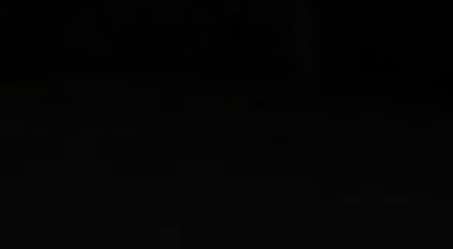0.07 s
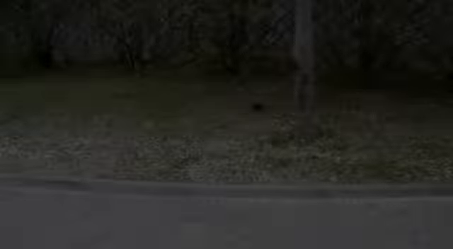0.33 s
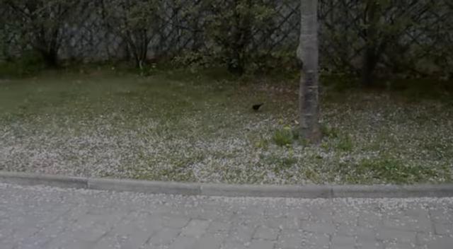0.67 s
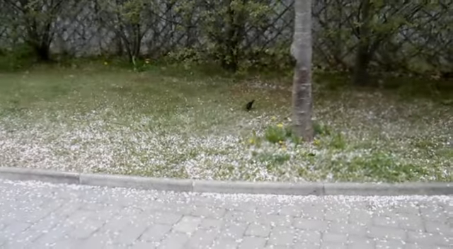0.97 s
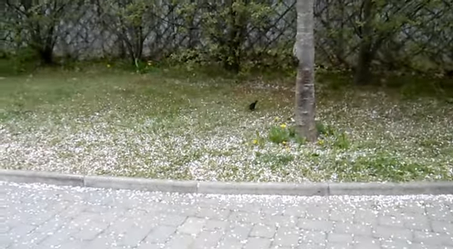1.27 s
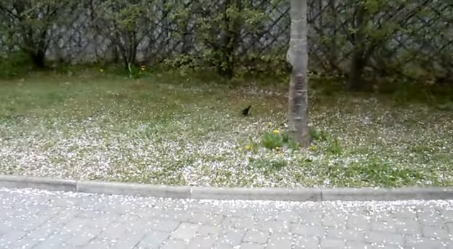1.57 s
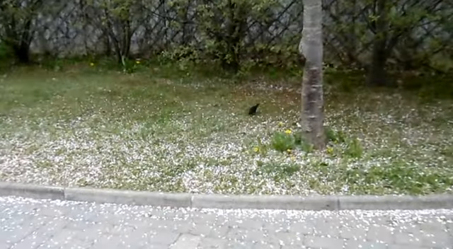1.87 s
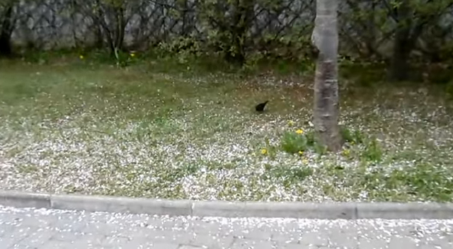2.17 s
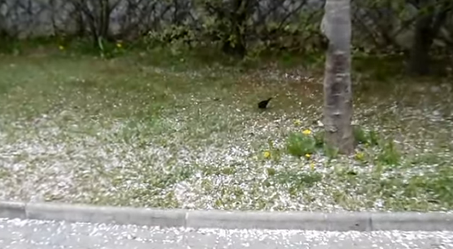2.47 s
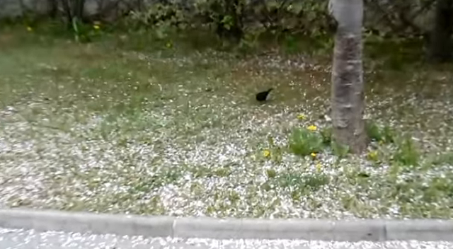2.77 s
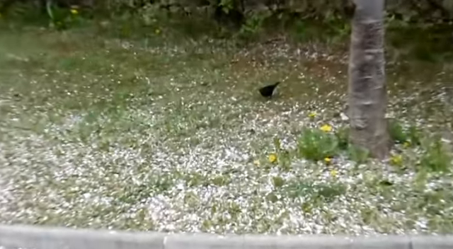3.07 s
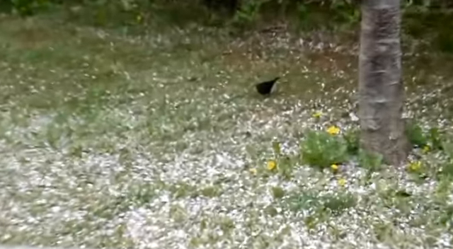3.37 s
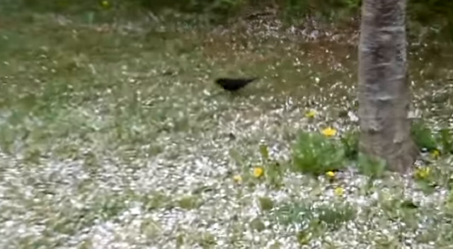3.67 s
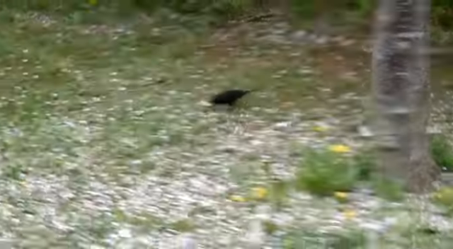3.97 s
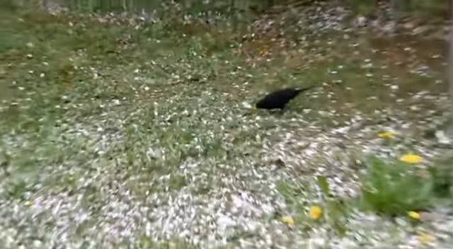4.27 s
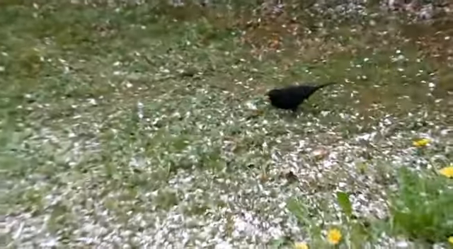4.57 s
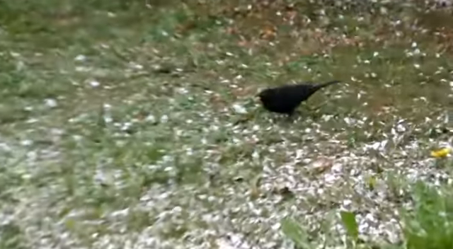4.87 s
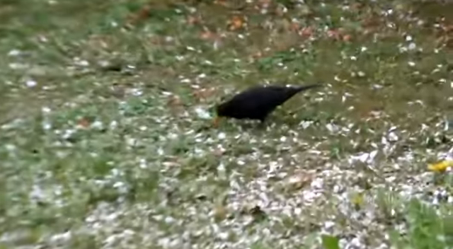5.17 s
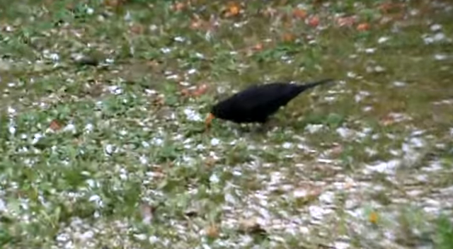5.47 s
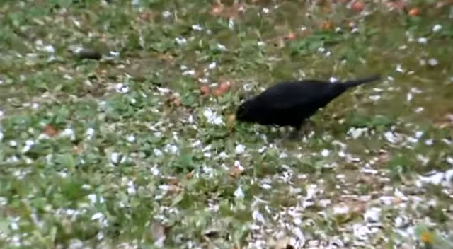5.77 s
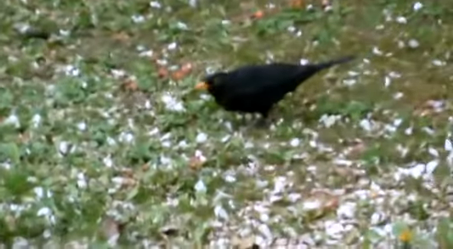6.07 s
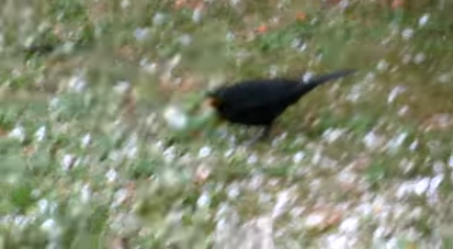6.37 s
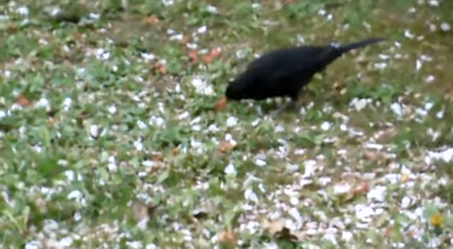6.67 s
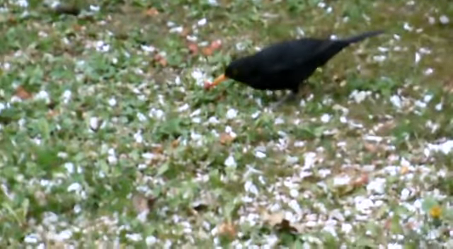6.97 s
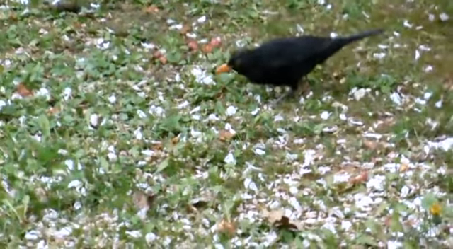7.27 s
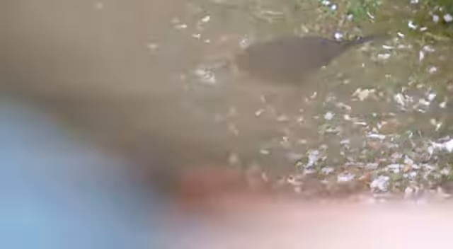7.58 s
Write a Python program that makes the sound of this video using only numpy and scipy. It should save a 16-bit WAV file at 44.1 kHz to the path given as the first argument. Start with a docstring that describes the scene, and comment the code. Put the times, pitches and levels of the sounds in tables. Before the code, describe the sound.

Steady distant traffic hums over a quiet park, with small camera clicks, a faint zoom sizzle and a coasting bicycle ticking closer.

```python
"""A quiet park lawn fades in: far tyres blend into a steady wash and a few engines drone. A finger ticks on a
hand-held camera, then its zoom lever snaps and rings the plastic shell. A motor moves the lens, which sizzles
and ticks from rubbing, the sizzle swelling for a while as two cars pass a little closer. The lens clicks
against its stop. Near the end a bicycle coasts up the path, ticking fast as the small catch in its freewheel
drops off tooth after tooth."""
import sys
import numpy as np
from scipy import signal
from scipy.fft import rfft, irfft, next_fast_len
from scipy.io import wavfile

SR = 44100
rng = np.random.default_rng(int(sys.argv[2]) if len(sys.argv) > 2 else 0)


def master_out(mix):
    """Clip the mix to full scale and print it as 16-bit PCM to the path in sys.argv[1]."""
    frames = np.transpose(np.atleast_2d(mix))
    ceiling = np.clip(frames, -1, 1)
    pcm = np.round(ceiling * 32767).astype(np.int16)
    wavfile.write(sys.argv[1], SR, pcm)


N = 344421
TIME = np.arange(N) / SR

# the tone colour of plastic rubbing on plastic: (frequency [Hz], level [dB])
PLASTIC_GRIT = [(2200, -2.5), (3500, 4.5), (5500, 4.5), (7500, 1.5), (9000, -7), (11000, -11)]
# the tone colour of hissing tyres: (frequency [Hz], level [dB])
TYRE_HISS = [(700, 0), (1200, -3), (1600, 2.5), (2200, 0.5), (3000, -5.5), (3900, -7.5), (4700, -8.5),
             (5700, -10), (6800, -11), (9000, -17.5), (11000, -30.5)]


def zoom_snaps(shell_db=-15.0, crack_db=6.0, grit_db=-9.0, low_cut_hz=1050):
    """The lever and the lens stop snap: each short, gritty crack makes the plastic shell ring."""
    # the snaps: (time [s], level [dB], pitch of the crack [Hz], share passed to the shell [dB])
    snaps = [(1.3983, -35.5, 4700, 2), (1.4186, -12, 3960, 2), (5.9112, -30.5, 2130, -12),
             (5.934, -33, 3310, -4), (5.9378, -33, 2980, -1), (5.946, -30.5, 3400, -1),
             (6.145, -41, 2800, -10), (6.1725, -15, 4700, -17)]
    # the notes the shell rings with: (pitch [Hz], level [dB], time to fall 60 dB [s])
    shell_notes = [(1160, -11, .012), (1520, -24, 0.0097), (2600, -10.5, 0.014), (3170, -2, 0.0019),
                   (4030, -8, 0.0063), (4640, 0.5, 0.003), (5330, -23, 0.0041), (6070, 8, 0.004),
                   (7500, -2, 0.0027), (8550, 2, .003), (9860, 5.5, 0.0041)]
    cracks = [ring(impulses([(s, db)]), hz, decay_s=0.0021) for s, db, hz, _ in snaps]
    push = sum(from_db(share_db) * crack for (*_, share_db), crack in zip(snaps, cracks))
    shell = 0
    for k, (hz, db, decay_s) in enumerate(shell_notes):
        shell += (-1) ** k * from_db(db) * ring(push, hz, decay_s)   # every other note is flipped
    grit = slips([(s, db) for s, db, _, _ in snaps], rise_s=0.0007) * noise(PLASTIC_GRIT)
    sound = from_db(shell_db) * shell + from_db(crack_db) * sum(cracks) + from_db(grit_db) * grit
    # so small a body gives off no bass
    return signal.sosfilt(signal.butter(3, low_cut_hz, "high", fs=SR, output="sos"), sound)


def bicycle(nearest_s=7.856, nearest_m=0.72, speed_m_per_s=6.5, ticks_per_s=55.1):
    """The freewheel's catch drops off each tooth: thin from afar, louder and fuller as it nears."""
    # the tone colour of the catch from far away: (frequency [Hz], level [dB])
    far_colour = [(2000, -15), (4500, -15), (6000, -1), (6800, 5), (8000, 7), (9000, -4), (11000, -15)]
    # the same catch close by: (frequency [Hz], level [dB])
    near_colour = [(800, -10), (1100, 5), (1450, -11), (2100, -10), (2500, 4), (2900, 7), (3500, 1.5),
                   (4200, -2.5), (4950, 2.5), (5800, 1.5), (7000, -1), (9000, -7.5), (11000, -16)]
    catch_db, tyres_db, rattle = -47, -50.5, 0.19
    distance_m = np.hypot(nearest_m, speed_m_per_s * (TIME - nearest_s))
    near = 1 / (1 + (distance_m / 3.3) ** 2)   # more full than thin within 3.3 m
    since_tick_s = (TIME - 7.7853) % (1 / ticks_per_s)   # one tick falls at 7.7853 s
    ticks = burst(since_tick_s, rise_s=0.0016) + rattle * (1 + near / 2)
    ticks = unit_power(ticks * flicker(db=1.0, rate=30))
    metal = np.sqrt(1 - near) * noise(far_colour) + np.sqrt(near) * noise(near_colour)
    coasting = gate(start_s=6.63, end_s=np.inf, edge_s=0.55)
    freewheel = coasting * from_db(catch_db) / distance_m * ticks * metal
    tyres = from_db(tyres_db) * near * noise(TYRE_HISS)
    return freewheel + tyres


def camera_ticks(thin_db=-3.5, full_db=-3.0, rise_s=0.00081):
    """Tiny slips in the lens gears make bright ticks, a few of them fuller than the rest; the first, before the
    motor starts, is a finger touching the camera."""
    # the ticks: (time [s], level [dB], fullness [0-1])
    ticks = [(1.077, -32, 0.5), (1.77, -38, 0.03), (2.19, -44, 0.06), (2.4445, -44, 0.5),
             (2.783, -39.5, 0.06), (2.9914, -40, 0), (3.1143, -38, .05), (3.119, -38.5, 0),
             (3.1583, -35, .15), (3.3106, -44, 0), (3.553, -41, 0.3), (4.3064, -45, 0.1),
             (5.6348, -47, 0.2)]
    # the tone colour of a thin tick: (frequency [Hz], level [dB])
    tick_colour = [(4500, -20), (5500, -3), (6400, 6.5), (7600, 11.5), (9000, 2), (11000, -20)]
    s, db, fullness = np.transpose(ticks)
    fullness_db = 10 * np.log10(np.clip(fullness, 1e-6, 1))
    thin = slips(np.c_[s, db], rise_s) * noise(tick_colour)
    full = slips(np.c_[s, db + fullness_db], rise_s) * noise(PLASTIC_GRIT)
    return from_db(thin_db) * thin + from_db(full_db) * full


def zoom_motor(start_s=1.68, end_s=5.9, running_db=-67, spin_up_s=0.026):
    """The motor starts with a soft jolt; then the moving lens rubs and sizzles inside its tube."""
    # the pitches the lens tube favours: (pitch [Hz], width [Hz], level [dB])
    tube_notes = [(4740, 340, 1), (6550, 480, 1), (7250, 460, -3), (9200, 370, -11)]
    # the motor's kick against the camera body: (time [s], level [dB])
    kick = [(1.677, -46)]
    # the tone colour of that kick: (frequency [Hz], level [dB])
    kick_colour = [(70, -2), (170, 0), (300, -10), (680, -9), (1200, -12)]
    rubbing = flicker(db=4.5, rate=60) * rng.standard_normal(N)
    sizzle = 0
    for hz, width_hz, db in tube_notes:
        sizzle += from_db(db) * signal.lfilter(*signal.iirpeak(hz, hz / width_hz, fs=SR), rubbing)
    spin_up = swell(start_s + spin_up_s, spin_up_s, db=-57)   # louder for a moment at first
    loudness = gate(start_s, end_s, edge_s=0.015) * (from_db(running_db) + spin_up)
    jolt = slips(kick, rise_s=0.0059) * noise(kick_colour)
    return loudness * unit_power(sizzle) + jolt


def scrapes():
    """Longer slides inside the camera swell and fade with a grainy rubbing noise."""
    # the slides: (time [s], length [s], level [dB])
    slides = [(1.415, 0.034, -47), (1.467, .016, -51.5), (1.683, 0.019, -51), (3.279, 0.12, -59.5),
              (5.63, 0.11, -57), (5.925, 0.083, -49.5)]
    # their tone colour: (frequency [Hz], level [dB])
    slide_colour = [(500, -10), (1700, 12.5), (3000, 5), (5000, 0.5), (6600, 3), (9000, -3), (11000, -24)]
    rubbing = unit_power(flicker(db=6.5, rate=150) * noise(slide_colour))
    return sum(swell(*slide) for slide in slides) * rubbing


def motor_swell():
    """The motor's sizzle swells once around 3 s with a faint, high crackle."""
    # the tone colour of that crackle: (frequency [Hz], level [dB])
    crackle_colour = [(5200, -6), (6200, -1), (6700, 3), (7400, -1), (9000, -6), (10500, -24)]
    crackle = unit_power(flicker(db=5.5, rate=60) * noise(crackle_colour))
    return swell(middle_s=3.07, length_s=1.25, db=-64.5) * crackle


def passing_cars():
    """The tyres of two nearer cars hum, rising out of the far traffic and sinking back."""
    # the cars: (time when nearest [s], level [dB], time to fall 3 dB [s])
    cars = [(4.12, -52, 0.41), (5.801, -60, 1)]
    # the tone colour of their hum: (frequency [Hz], level [dB])
    hum_colour = [(440, -9), (540, 3), (620, -1), (730, 1.5), (850, -7.5), (1000, -15)]
    power = sum((from_db(db) * going_by(s, fall_s)) ** 2 for s, db, fall_s in cars)
    return np.sqrt(power) * flicker(db=1.5, rate=8) * noise(hum_colour)


def far_engines(settle_s=2.0, wobble_rad=0.39):
    """Only the firing tone of each engine carries this far, and it flutters on its way through the air."""
    # spells of speeding up, slowing down or idling:
    # (start [s], length [s], first pitch [Hz], last pitch [Hz], first level [dB], last level [dB])
    runs = [ (0, 1.7, 56.3, 54.8, -52, -50), (.7, 1.5, 114, 102, -60, -63.5),
            (1.05, 1.06, 38.5, 43.5, -59, -53.5), (1.079, 1.05, 336, 361, -59.5, -65.5),
            (2.4, 5.2, 57.8, 71, -59.5, -67), (2.45, 5.23, 88, 119, -58.5, -63),
            (2.5, 1.93, 44.6, 52.5, -54, -61), (3.5, 2.3, 156, 171, -65, -67),
            (3.852, 1.0, 334, 352.4, -60, -65.5), (4.598, 1.6, 146.5, 135, -62.5, -65.5),
            (4.8, .95, 47.3, 45.6, -58, -55), (5.753, 0.66, 44.8, 29.8, -54, -62),
            (6.85, 0.58, 42.5, 42, -59, -56)]
    sound = 0
    for start_s, length_s, first_hz, last_hz, first_db, last_db in runs:
        end_s = start_s + length_s
        # the engine's speed changes fastest at first, then settles
        settled = 1 - np.exp(-np.clip(TIME - start_s, 0, length_s) / settle_s)
        hz = first_hz + (last_hz - first_hz) * settled / settled[-1]
        level_db = np.interp(TIME, [start_s, end_s], [first_db, last_db])
        loudness = from_db(level_db) * flicker(db=1.4, rate=5)
        cycles = np.cumsum(hz) / SR + rng.random()
        tone = np.sqrt(2) * np.sin(2 * np.pi * cycles + wobble_rad * drift(rate=4.4))
        sound += gate(start_s, end_s, edge_s=0.11) * loudness * tone
    return sound


def far_traffic(roar_db=-50, hiss_db=-52, rumble_db=-55.5):
    """Many far tyres blend into a roar, with a bright hiss above it and a lumpy rumble below."""
    # the tone colour of the roar: (frequency [Hz], level [dB])
    roar_colour = [(76, -31), (130, -4.5), (173, -4.5), (215, 1.5), (354, -2), (413, -4.5), (610, 0.5),
                   (740, -4), (937, -0.5), (1230, -4), (1500, -7.5), (1950, -41), (3300, -120)]
    # the tone colour of the rumble: (frequency [Hz], level [dB])
    rumble_colour = [(10, -14), (25, -7), (42, -0.5), (60, 0.5), (82, -3), (115, -7.5), (160, -15),
                     (260, -31)]
    slow_swell = going_by(nearest_s=3.1, fall_s=8.3)
    roar = from_db(roar_db) * flicker(db=0.06, rate=2.7) * slow_swell * noise(roar_colour)
    hiss = from_db(hiss_db) * flicker(db=0.06, rate=3.1) * noise(TYRE_HISS)
    rumble = from_db(rumble_db) * flicker(db=1.5, rate=5.6) * noise(rumble_colour)
    return roar + hiss + rumble


def from_db(db):
    """Turn decibels into a number to multiply by."""
    return 10 ** (np.asarray(db) / 20)


def unit_power(x):
    """Scale a signal so that its average power is 1."""
    return x / np.sqrt(np.mean(x ** 2) + 1e-20)


def drift(rate):
    """A smooth random curve of typical size 1, changing about `rate` times a second."""
    size = next_fast_len(N)
    hz = np.fft.rfftfreq(size, 1 / SR)
    return unit_power(irfft(rfft(rng.standard_normal(size)) / (1 + (hz / rate) ** 2), size)[:N])


def flicker(db, rate):
    """A loudness that wanders up and down by about `db` decibels."""
    return from_db(db * drift(rate))


def noise(colour):
    """Noise of power 1 shaped by (frequency [Hz], level [dB]) rows, falling steeply past their ends."""
    size = next_fast_len(N)
    hz = np.maximum(np.fft.rfftfreq(size, 1 / SR), 1)
    row_hz, row_db = np.transpose(colour)
    fall_off = np.minimum(1, np.minimum(hz / row_hz[0], row_hz[-1] / hz)) ** 4
    gain = from_db(np.interp(np.log(hz), np.log(row_hz), row_db)) * fall_off
    return unit_power(irfft(rfft(rng.standard_normal(size)) * gain, size)[:N])


def ring(push, hz, decay_s):
    """Each push sets a pure tone ringing, which falls 60 dB in decay_s."""
    decay = 10 ** (-3 / (decay_s * SR))
    angle = 2 * np.pi * hz / SR
    return signal.lfilter([0, np.sin(angle)], [1, -2 * decay * np.cos(angle), decay ** 2], push + 1e-18)


def impulses(rows):
    """A one-sample spike for each (time [s], level [dB]) row."""
    s, db = np.transpose(rows)
    return np.bincount(np.round(s * SR).astype(int), from_db(db), N)[:N]


def burst(age_s, rise_s):
    """The loudness of a brief touch: up to 1 at rise_s, then dying away."""
    progress = np.maximum(age_s, 0) / rise_s
    return progress * np.exp(1 - progress)


def slips(rows, rise_s):
    """A loudness curve with one burst for each (time [s], level [dB]) row."""
    return signal.oaconvolve(impulses(rows), burst(TIME[:SR // 20], rise_s))[:N]


def going_by(nearest_s, fall_s):
    """The loudness of something passing in a straight line: 1 when nearest, 3 dB less fall_s away."""
    return 1 / np.hypot(1, (TIME - nearest_s) / fall_s)


def gate(start_s, end_s, edge_s):
    """1 between two times and 0 outside, with sloping edges."""
    return np.clip(np.minimum(TIME - start_s, end_s - TIME) / edge_s + .5, 0, 1)


def swell(middle_s, length_s, db):
    """A loudness that rises smoothly to `db` at middle_s and falls again."""
    return from_db(db) * np.exp(-2 * ((TIME - middle_s) / length_s) ** 2)


def scene():
    """The distant town, the zooming camera and the bicycle, added into one channel."""
    town = far_traffic() + passing_cars() + far_engines()
    camera = zoom_snaps() + camera_ticks() + scrapes() + zoom_motor() + motor_swell()
    return (town + camera + bicycle())[None]


def record(dry, dip_hz=8000, dip_db=-15.0, dull_hz=9200, cutoff_hz=11050):
    """A small microphone with a narrow dip in the treble and a dull top; the sound fades in."""
    fade_start_s, fade_length_s = 0.053, 1.035
    x = signal.lfilter(*signal.iirnotch(dip_hz, Q=8.1, fs=SR), dry)
    x = x + from_db(dip_db) * (dry - x)   # a little still gets through the dip
    x = signal.sosfilt(signal.butter(8, dull_hz, fs=SR, output="sos"), x)
    x = x * np.clip((TIME - fade_start_s) / fade_length_s, 0, 1)
    return signal.sosfilt(signal.ellip(10, .2, 80, cutoff_hz, fs=SR, output="sos"), x)


dry = scene()
out = record(dry)
master_out(out)
```